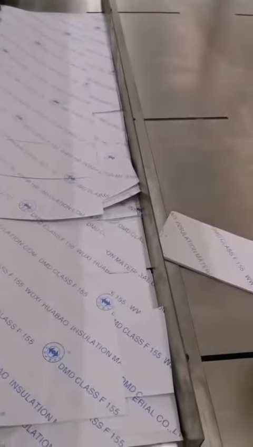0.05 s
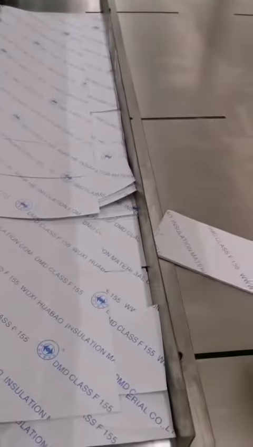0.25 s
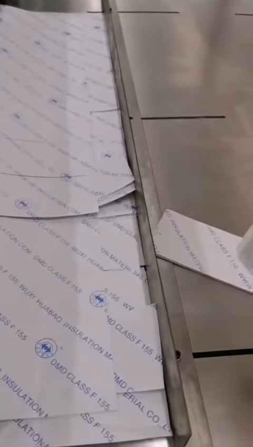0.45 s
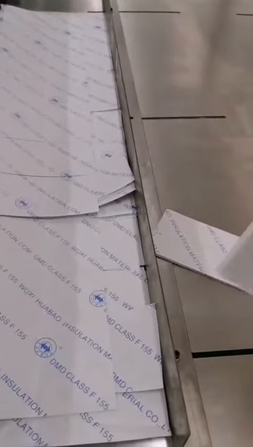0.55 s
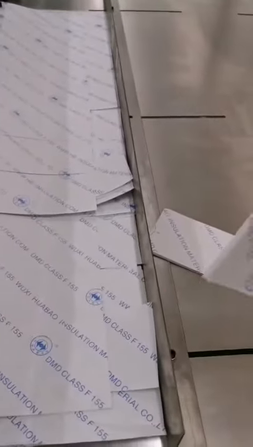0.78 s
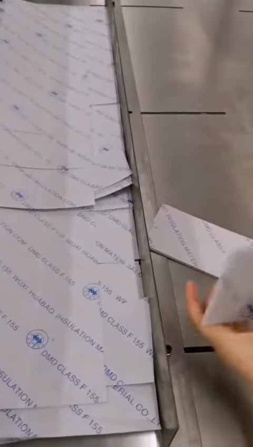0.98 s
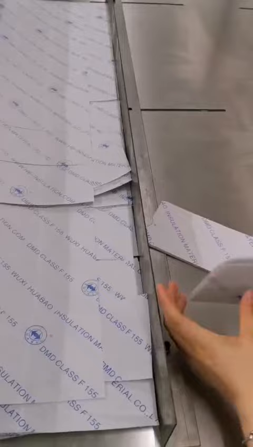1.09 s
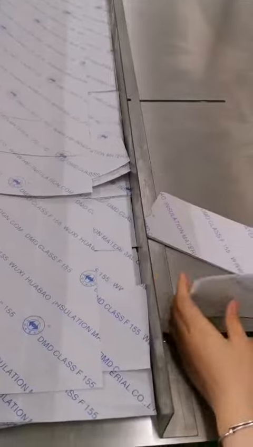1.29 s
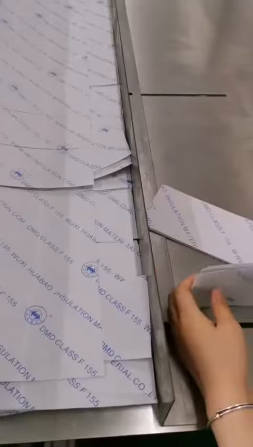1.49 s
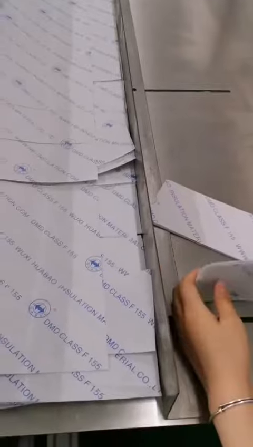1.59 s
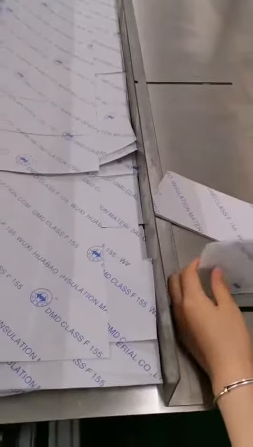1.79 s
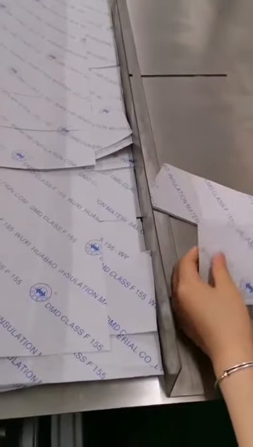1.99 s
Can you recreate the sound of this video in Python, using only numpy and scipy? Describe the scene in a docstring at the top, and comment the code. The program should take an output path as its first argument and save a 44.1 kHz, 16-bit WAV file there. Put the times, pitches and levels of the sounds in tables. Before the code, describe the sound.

A sheet-cutting machine, heard up close, pushes stiff paper over steel in two rasping swishes at about 0.2 and 0.45 seconds. At 0.8 seconds the blade lands with a hard metallic chop, the loudest sound, ringing briefly in the room. Near 1.5 seconds a hand shoves the strips with a soft hollow scuff, then light paper rustles and ticks follow until 2 seconds. A faint motor hum continues underneath.

```python
"""Two swishes, then a hard, ringing chop: a guillotine sheet cutter in a humming workshop.
Stiff insulating paper slips over the steel bed; the blade shears it in a cluster of hard contacts
that ring the frame and the room. A hand gathers the strips with a hollow scuff and small rustles.
The microphone is close, with a bright left port and a dull right one."""
import sys
import numpy as np
from scipy import signal
from scipy.fft import rfft, irfft, next_fast_len
from scipy.io import wavfile

SR = 44100
rng = np.random.default_rng(int(sys.argv[2]) if len(sys.argv) > 2 else 0)


def unload_wav(signal):
    """Save mono or channel-first audio to the path in sys.argv[1] as 16-bit WAV at rate SR, clipped to [-1, 1]."""
    wavfile.write(
        sys.argv[1],
        SR,
        np.round(np.clip(np.atleast_2d(signal).T, -1, 1) * 32767).astype(np.int16),
    )


N = 90404
T = np.arange(N) / SR
SHEET_GRAINS_PER_S, SHEET_GRAIN_SIZE_DB = 5000, -0.5
# Stereo field. Each row: frequency in Hz, left-right correlation.
CORRELATION = [(60, 0.96), (140, 0.93), (300, 0.76), (650, 0.57), (1300, -0.26), (2400, -0.026),
               (4000, -0.057)]


def chop(room):
    """The blade cracks and shears the sheet, the beam lands, the frame rings and the bed booms."""
    # Each row: peak time in seconds, level in dB, attack in seconds, release in seconds.
    bites = [(0.8165, -27.5, 0.00099, 0.0029), (0.819, -23, 0.0009, 0.003), (0.8235, -29, 0.0015, 0.0098)]
    shears = [(0.823, -37, 0.0091, 0.017), (0.856, -40, 0.011, 0.029)]  # severed edge crunches and whips clear
    landings = [(0.833, -26.5, 0.0015, 0.006), (0.8435, -33, 0.00081, 0.036),
                (0.935, -40.5, 0.0073, 0.0093), (1.09, -48, 0.0055, 0.0091)]
    bed_swells = [(0.85, -42, 0.008, 0.03), (0.895, -39.5, 0.016, 0.024), (0.938, -37, 0.009, 0.014),
                  (1.05, -49.5, 0.091, 0.042)]
    # Spectra. Each row: frequency in Hz, relative density in dB.
    bite_colour = [(150, -14.5), (450, -9.5), (680, -10), (980, -9.5), (1130, 1.5), (1280, 6), (1390, -13),
                   (1520, 5), (1800, -18), (2080, 1.5), (2380, -1.5), (3100, -12.5), (3500, -8),
                   (3870, -20), (4230, -7), (5250, -11), (5900, -17.5), (11000, -21.5), (15500, -22)]
    shear_colour = [(1800, -12), (2350, 10), (3000, -2.5), (3500, 7), (5200, -1.5), (6200, -4),
                    (8500, -6.5), (11500, -1.5), (15500, -19)]
    landing_colour = [(80, -13), (200, -8), (310, -5.5), (540, -0.5), (630, 0), (680, 0.5), (770, -2),
                      (850, -0.5), (980, -9), (1100, 1.5), (1290, 7), (1390, -8.5), (1560, -2), (1800, -17),
                      (6000, -27.5)]
    bed_colour = [(100, -8), (220, -14), (290, -2.5), (355, 4), (400, -3), (460, -1.5), (600, -10.5),
                  (1200, -55)]
    crack = in_room(clacks() + bursts(bites, close_noise(), bite_colour), room, wet_db=-6)
    fibres = grains(SHEET_GRAINS_PER_S, SHEET_GRAIN_SIZE_DB)
    crunch = in_room(bursts(shears, fibres, shear_colour), room, wet_db=-6.5)
    thud = in_room(bursts(landings, close_noise(), landing_colour), room, wet_db=-5)
    ring = in_room(frame(), room, wet_db=-10)
    boom = bursts(bed_swells, noise(), bed_colour)
    return pan(left_db=0.5) * (crack + crunch + thud + ring) + boom


def clacks(right_lag_s=0.00008):
    """Steel meets steel as the blade passes and the beam lands."""
    # Each row: time in seconds, peak level in dB.
    impacts = [(0.8158, -26), (0.8188, -22), (0.8195, -18.5), (0.8327, -19.5), (0.8432, -26)]
    # Spectrum of one impact. Each row: frequency in Hz, relative level in dB.
    steel_colour = [(200, -15), (500, -11), (680, -13), (980, -4.5), (1130, 16.5), (1380, 1), (1520, 1),
                    (1800, -13), (2350, -16), (3100, -9), (4500, -6), (6500, -35), (11000, -5.5),
                    (15500, -23.5)]
    ring = tap_response(steel_colour)
    hits = sum(from_db(db) * delayed(ring, time_s) for time_s, db in impacts)
    return np.array([hits, delayed(hits, right_lag_s)])


def frame(strike_s=0.819, gain_db=-25):
    """The struck frame rings in damped modes, each offset in phase between the ports as the stereo correlation
    at its frequency sets: nearly in step in the bass, widest near 1.3 kHz."""
    # Each row: frequency in Hz, level in dB relative to gain_db, T60 in seconds.
    modes = [(244.3, -20, 0.66), (312.5, -19.5, 0.71), (345.9, -17, 0.48), (371, -16, 0.37),
             (453, -21.5, 0.9), (669, -9.5, 0.26), (735, -25, 0.68), (856, -8, 0.22), (1116, -10, 0.38),
             (1180, -18, 0.44), (1263, -13.5, 0.44), (1312, -12.5, 0.35), (1540, -24, 0.6),
             (1615, -19, 0.69), (2190, -28, 0.22), (2372, -20, 0.53)]
    age_s = np.maximum(T - strike_s, 0)
    ring = 0
    for hz, db, t60_s in modes:
        skew_rad = np.arccos(at_hz(CORRELATION, hz)) * rng.choice([-1, 1]) / 2
        phase = 2 * np.pi * (hz * age_s + rng.random()) + skew_rad * np.array([[1], [-1]])
        onset = 1 - np.exp(-age_s * hz / 2)
        ring = ring + np.sin(phase) * from_db(gain_db + db - 60 * age_s / t60_s) * onset
    return ring


def feed(room):
    """The sheet is pushed twice: it rasps, scrapes and drums on the bed; the mechanism sings faintly."""
    # Stroke envelopes. Each row: time in seconds, level in dB before gain_db.
    first_stroke = [(0.181, -73), (0.196, -43.5), (0.214, -42), (0.229, -38), (0.25, -42), (0.29, -43.5),
                    (0.34, -48.5), (0.40, -53.5)]
    second_stroke = [(0.40, -59), (0.42, -52), (0.433, -37.5), (0.458, -36), (0.485, -39), (0.53, -41),
                     (0.62, -42), (0.68, -51), (0.76, -76)]
    # Each row: peak time in seconds, level in dB, attack in seconds, release in seconds.
    rasps = [(0.2235, -38, 0.0015, 0.0036), (0.2305, -40.5, 0.0013, 0.005), (0.266, -49, 0.004, 0.017),
             (0.462, -45, 0.008, 0.018)]  # edge catches early in each stroke
    scrapes = [(0.409, -54, 0.005, 0.012), (0.437, -40, 0.013, 0.025)]  # second push begins
    drumming = [(0.416, -44, 0.014, 0.022), (0.51, -39.5, 0.023, 0.061)]
    singing = [(0.52, -45.5, 0.012, 0.059), (0.67, -55.5, 0.049, 0.036)]  # while the sheet slows
    # Spectra. Each row: frequency in Hz, relative density in dB.
    first_colour = [(300, -15.5), (600, -2.5), (950, -2.5), (1330, 10), (1580, -2.5), (1950, 5.5),
                    (2500, -1), (3300, 0), (4700, -5.5), (6500, -1.5), (10000, -0.5), (15500, -4.5)]
    second_colour = [(300, -30), (600, 6), (850, 7.5), (1450, 3.5), (1720, 8), (1950, 7.5), (2500, 6.5),
                     (3400, 0), (6500, 1.5), (10000, 5), (15500, 3)]
    rasp_colour = [(1500, -24), (2500, -11), (3050, 0.5), (3700, -3), (4300, -20), (8000, -19)]
    scrape_colour = [(500, -13), (850, 0), (1080, 9), (1500, -14), (1950, 1), (2300, 6.5), (2900, 2),
                     (3300, -24), (6000, -36)]
    drum_colour = [(150, -7), (400, -10.5), (950, 2.5), (1700, -0.5), (3000, -6), (8000, -19)]
    sing_colour = [(1200, -32), (1650, -17), (1765, -8), (1880, -18), (2500, -47)]
    slide = feed_stroke(first_stroke, first_colour, gain_db=2)
    slide += feed_stroke(second_stroke, second_colour, gain_db=-1)
    edge = bursts(rasps, close_noise(), rasp_colour) + bursts(scrapes, noise(), scrape_colour)
    rings = bursts(drumming, noise(), drum_colour) + bursts(singing, noise(), sing_colour)
    return in_room(slide + edge + rings, room, wet_db=-7.5)


def feed_stroke(envelope, colour, gain_db, fade_s=0.0065):
    """Paper fibres slip over steel in one swish."""
    times_s, db = np.transpose(envelope)
    fade = np.clip(np.minimum(T - times_s[0], times_s[-1] - T) / fade_s + 1, 0, 1)
    slips = flicker(grains(SHEET_GRAINS_PER_S, SHEET_GRAIN_SIZE_DB), depth_db=2, rate_hz=45)
    return fade * from_db(np.interp(T, times_s, db) + gain_db) * unit_rms(tint(slips, colour))


def scuff(room):
    """The bundle of strips is shoved along the bed, which answers with a hollow note."""
    # Each row: peak time in seconds, level in dB, attack in seconds, release in seconds.
    shoves = [(1.450, -49.5, 0.019, 0.007), (1.462, -43.5, 0.0055, 0.0051), (1.4705, -48.5, 0.002, 0.0034)]
    bed_notes = [(1.458, -47.5, 0.033, 0.065), (1.502, -47.5, 0.0063, 0.032), (1.562, -51, 0.012, 0.019)]
    # Spectra. Each row: frequency in Hz, relative density in dB.
    shove_colour = [(500, -19), (1000, -2), (1290, 10), (1470, 7), (1720, -7.5), (1950, -3), (2250, -5),
                    (3200, -17), (14000, -38)]
    note_colour = [(150, -12), (400, -14.5), (660, -7), (755, 2.5), (850, -12), (1000, -18), (2500, -34.5)]
    direct = bursts(shoves, noise(), shove_colour) + bursts(bed_notes, noise(), note_colour)
    return pan(left_db=1) * in_room(direct, room, wet_db=-9)


def strips(room):
    """Fingers slide on the strips; paper edges tick."""
    # Each row: peak time in seconds, level in dB, attack in seconds, release in seconds.
    rustles = [(1.465, -68, 0.025, 0.05), (1.6325, -54, 0.0013, .002), (1.637, -48, 0.001, .002),
               (1.665, -45, 0.013, 0.015), (1.681, -50.5, 0.005, 0.009), (1.71, -59, 0.012, 0.015),
               (1.98, -59, 0.016, 0.049), (2.042, -55, 0.019, .03)]
    ticks = [(0.786, -51, 0.0018, .004), (1.28, -55.5, .0015, .003), (1.902, -60, 0.002, .003),
             (1.916, -58, .002, .003), (1.9565, -49, 0.0009, 0.0058)]
    # Spectra. Each row: frequency in Hz, relative density in dB.
    rustle_colour = [(1000, -18), (2800, -8), (3400, -14), (4300, -8), (7000, -2), (11000, 3.5), (15500, 4)]
    tick_colour = [(800, -19), (1700, -9), (2450, 7), (3500, -6), (7000, -1), (11000, -2), (15500, 1)]
    fibres = grains(per_s=2200, size_db=1)
    paper = bursts(rustles, fibres, rustle_colour) + bursts(ticks, fibres, tick_colour)
    return pan(left_db=2) * in_room(paper, room, wet_db=-16.5)


def hall_echo():
    """An earlier noise dies away in the hall."""
    # Each row: peak time in seconds, level in dB, attack in seconds, release in seconds.
    tail = [(0.0, -44, .01, 0.096)]
    # Spectrum. Each row: frequency in Hz, relative density in dB.
    tail_colour = [(40, 8.5), (130, 1.5), (270, 2.5), (450, -10), (780, -1.5), (1200, -13), (3000, -26),
                   (7000, -22.5), (15000, -23.5)]
    return bursts(tail, noise(), tail_colour)


def workshop(waver_db=1.6, waver_rad=0.68, air_db=-54):
    """A wavering motor hum over the rumble and hiss of the hall."""
    # Motor partials. Each row: frequency in Hz, rms level in dB.
    partials = [(99.8, -56), (198.5, -67), (241, -68)]
    # Air spectrum. Each row: frequency in Hz, relative density in dB.
    air_colour = [(20, -9.5), (35, 4.5), (65, -5.5), (140, -2.5), (270, -11), (450, -15.5), (750, -16),
                  (1400, -23), (2400, -22.5), (4000, -30.5), (7000, -35.5), (11000, -37), (15500, -32)]
    hum = 0
    for hz, db in partials:
        amplitude = np.sqrt(2) * from_db(db + waver_db * drift(rate_hz=7.03))
        phase = 2 * np.pi * (hz * T + rng.random()) + waver_rad * drift(rate_hz=8)
        hum = hum + amplitude * np.sin(phase)
    air = tint(flicker(noise(), depth_db=2.5, rate_hz=38), air_colour)
    return hum + from_db(air_db) * unit_rms(air)


def room_response(build_s=0.0049):
    """Diffuse echoes build up and die away, the treble first."""
    # Each row: frequency in Hz, T60 in seconds.
    decay_times = [(100, 1), (350, 0.83), (1200, 0.55), (2500, 0.69), (5000, 0.6), (9000, 0.48),
                   (15000, 0.19)]
    tail = sum(band * from_db(-60 * T / at_hz(decay_times, hz)) for hz, band in bands(noise()))
    return unit_rms(tail * (1 - np.exp(-T / build_s))) / np.sqrt(N)


def in_room(x, room, wet_db):
    """Direct sound plus reverberation."""
    return x + from_db(wet_db) * signal.fftconvolve(x, room, axes=-1)[:, :N]


def bursts(events, source, colour):
    """Coloured source under Gaussian attacks and exponential releases, summed in power."""
    power = 0
    for peak_s, db, attack_s, release_s in events:
        age_s = T - peak_s
        falloff = np.where(age_s < 0, (age_s / attack_s) ** 2, age_s / release_s)
        power = power + (from_db(db) * np.exp(-falloff)) ** 2
    return np.sqrt(power) * unit_rms(tint(source, colour))


def tap_response(colour):
    """Minimum-phase ring of the given colour, unit peak."""
    magnitude = from_db(at_hz(colour, np.fft.rfftfreq(N, 1 / SR)))
    cepstrum = irfft(np.log(magnitude), N)
    causal_fold = 1 + np.sign(np.fft.fftfreq(N))
    ring = irfft(np.exp(rfft(cepstrum * causal_fold)), N)
    return ring / np.abs(ring).max()


def grains(per_s, size_db):
    """Dense tiny slips of uneven size, unit rms."""
    sizes = from_db(size_db * np.minimum(rng.exponential(1, (2, N)), 5))
    signs = rng.choice([-1, 1], (2, N))
    slipping = rng.random((2, N)) < per_s / SR
    return unit_rms(spread(sizes * signs * slipping))


def close_noise(shared=0.45):
    """Noise from one compact spot: a share of its power is identical at both ports."""
    return np.sqrt(shared) * rng.standard_normal(N) + np.sqrt(1 - shared) * noise()


def noise():
    """White stereo noise."""
    return spread(rng.standard_normal((2, N)))


def spread(pair):
    """Two unrelated signals become a stereo pair, alike in the bass."""
    mid, side = rfft(pair)
    alike = at_hz(CORRELATION, np.fft.rfftfreq(N, 1 / SR))
    return irfft(np.sqrt((1 + alike) / 2) * mid + np.sqrt((1 - alike) / 2) * side * [[1], [-1]], N)


def flicker(x, depth_db, rate_hz):
    """Each band's level wanders independently."""
    return sum(band * from_db(depth_db * drift(rate_hz)) for _, band in bands(x))


def bands(x, count=18):
    """Overlapping bands that sum to x, as pairs of centre in Hz and signal."""
    centres_hz = np.geomspace(50, 16000, count)
    size = next_fast_len(N)
    spectrum, hz = rfft(x, size), np.fft.rfftfreq(size, 1 / SR)
    weights = [at_hz(np.c_[centres_hz, one_hot], hz) for one_hot in np.eye(count)]
    return zip(centres_hz, [irfft(spectrum * weight, size)[..., :N] for weight in weights])


def drift(rate_hz):
    """Straight lines between unit Gaussian draws."""
    knots = rng.standard_normal(1024)
    return np.interp(T * rate_hz, np.arange(len(knots)), knots)


def tint(x, colour):
    """Zero-phase filter from rows of Hz and dB."""
    size = x.shape[-1]
    gain = from_db(at_hz(colour, np.fft.rfftfreq(2 * size, 1 / SR)))
    return irfft(rfft(x, 2 * size) * gain)[..., :size]


def at_hz(points, hz):
    """Read a table on a log-frequency axis."""
    knots_hz, values = np.transpose(points)
    return np.interp(np.log(np.maximum(hz, 1)), np.log(knots_hz), values)


def delayed(x, delay_s):
    """Fractional delay."""
    return np.interp(T - delay_s, T, x, left=0)


def pan(left_db):
    """Stereo gains, left above right by left_db."""
    return from_db(np.array([[left_db], [-left_db]]) / 2)


def unit_rms(x):
    """Scale to an rms of one."""
    return x / np.sqrt(np.mean(x ** 2) + 1e-20)


def from_db(db):
    """Decibels to gain."""
    return 10 ** (np.asarray(db) / 20)


def scene():
    """Cutter, hand and background in one room."""
    room = room_response()
    machine = feed(room) + chop(room)
    hand = scuff(room) + strips(room)
    hall = hall_echo() + workshop()
    return machine + hand + hall


def record(dry):
    """Bright left port, dull right port, steep low-pass."""
    # Port responses. Each row: frequency in Hz, gain in dB.
    left_port = [(100, -1.46), (300, 1.5), (650, 2), (1100, -0.5), (2200, 1), (4000, 1.65), (6500, 2.5),
                 (7600, -1.5), (8500, 3.5), (9700, 3), (10800, 7), (12000, 1), (14000, -1.5), (15500, -3)]
    right_port = [(100, -0.84), (300, 2), (650, -5.5), (1100, -0.5), (2200, -2), (4000, 2.7), (6500, 4),
                  (7400, -1), (8100, -13), (10800, -11.5), (15500, -11)]
    cutoff_hz = 15900
    ports = np.array([tint(dry[0], left_port), tint(dry[1], right_port)])
    return signal.sosfilt(signal.ellip(12, .1, 80, cutoff_hz, fs=SR, output="sos"), ports)


dry = scene()
out = record(dry)
unload_wav(out)
```